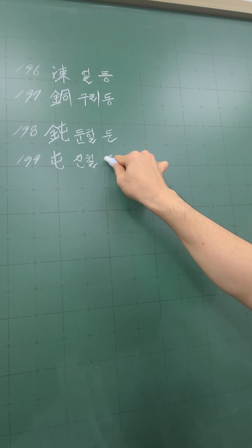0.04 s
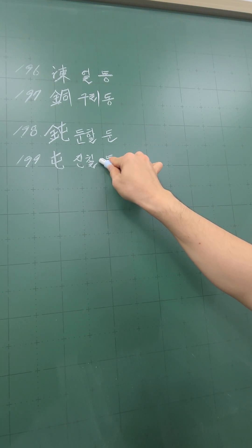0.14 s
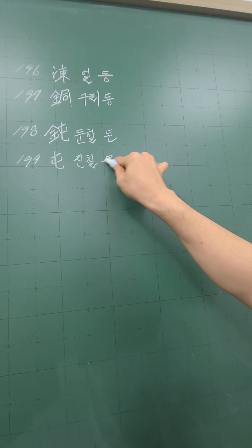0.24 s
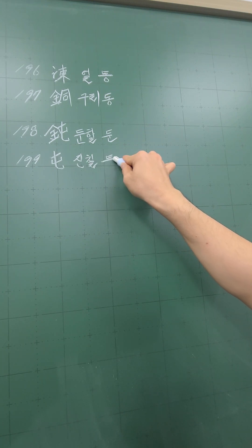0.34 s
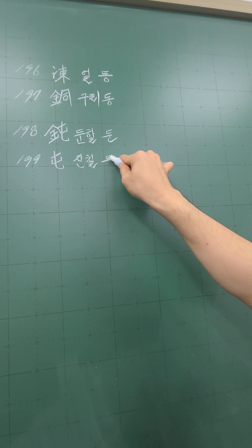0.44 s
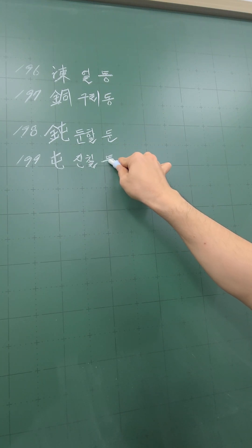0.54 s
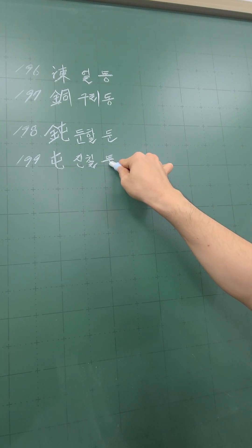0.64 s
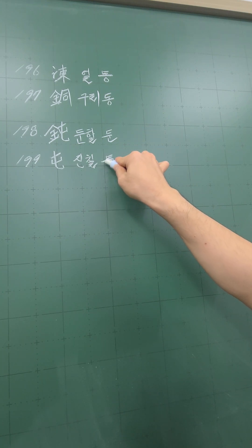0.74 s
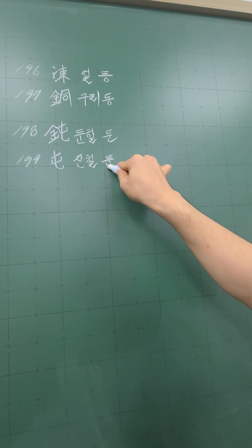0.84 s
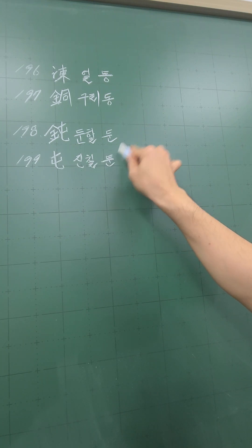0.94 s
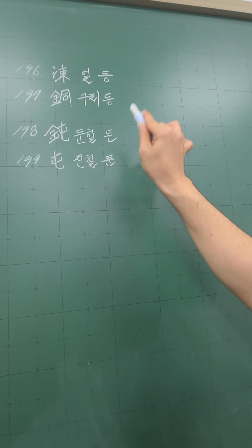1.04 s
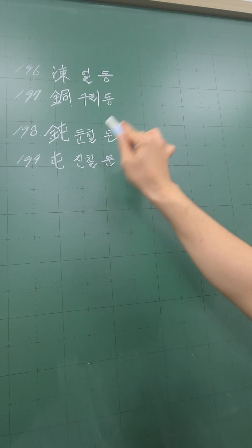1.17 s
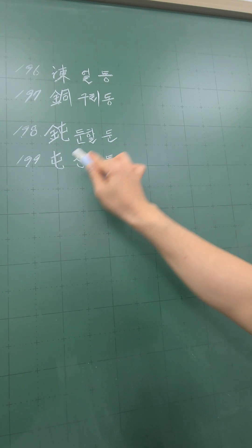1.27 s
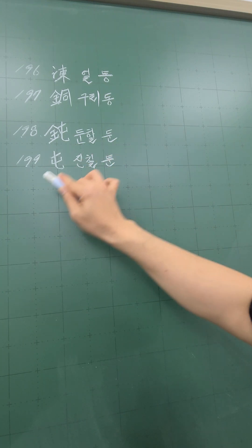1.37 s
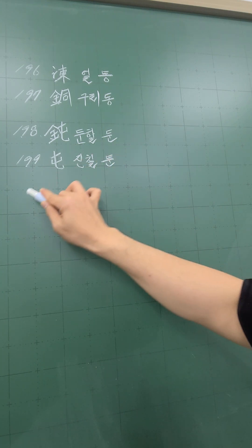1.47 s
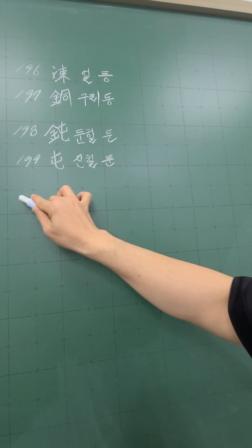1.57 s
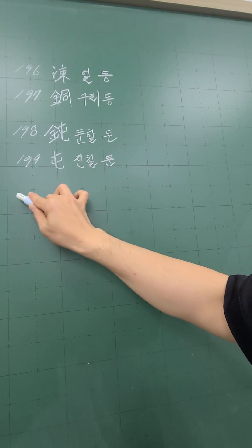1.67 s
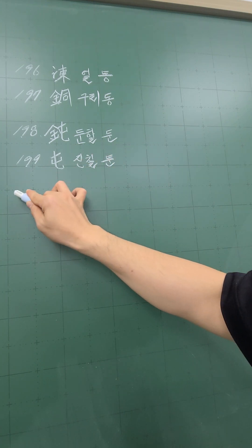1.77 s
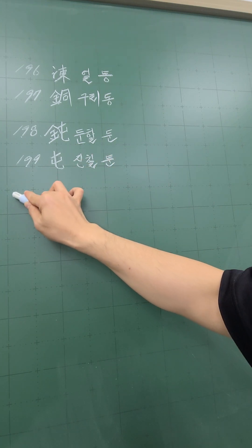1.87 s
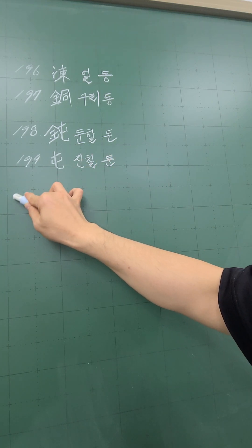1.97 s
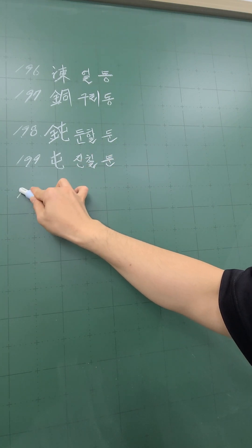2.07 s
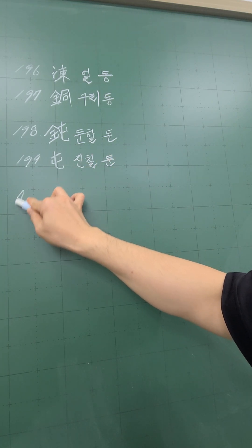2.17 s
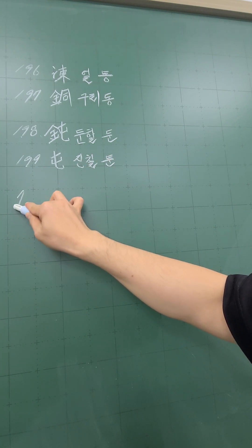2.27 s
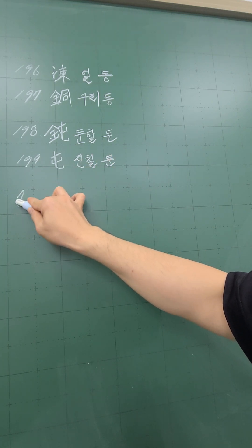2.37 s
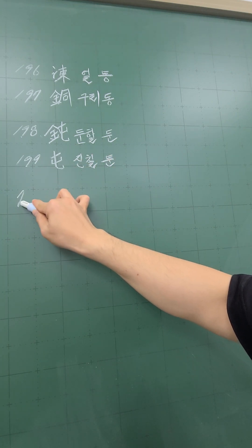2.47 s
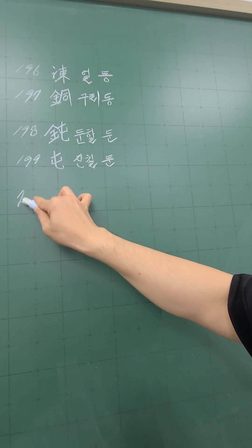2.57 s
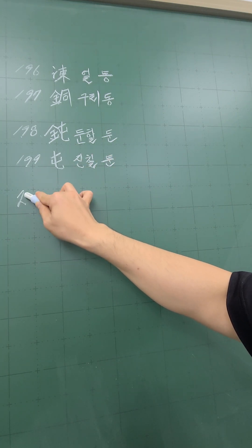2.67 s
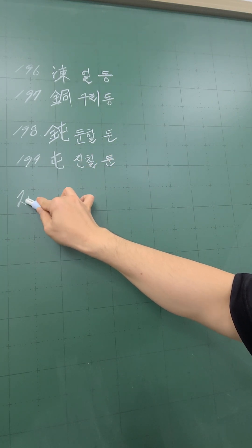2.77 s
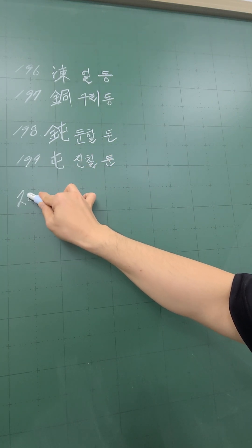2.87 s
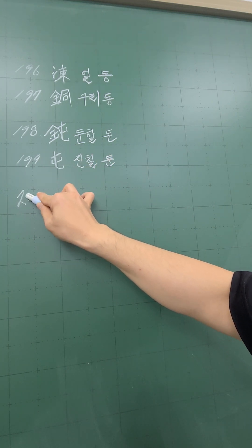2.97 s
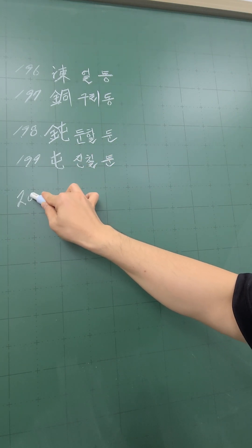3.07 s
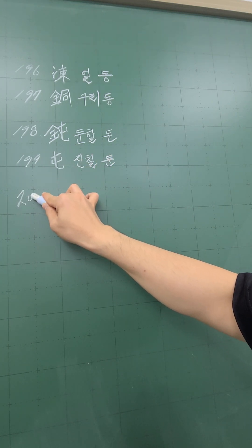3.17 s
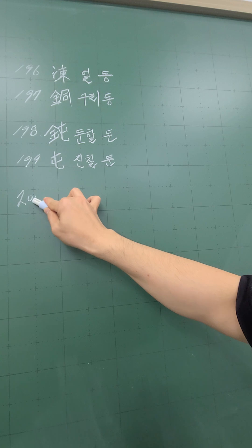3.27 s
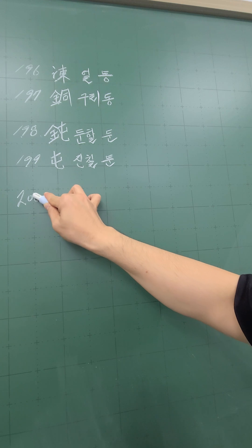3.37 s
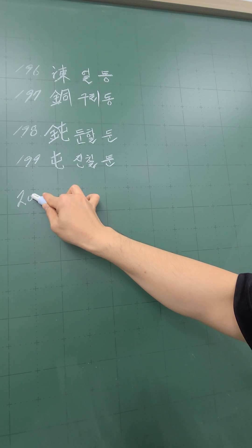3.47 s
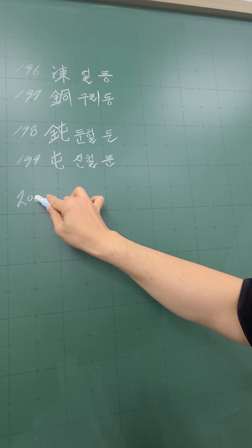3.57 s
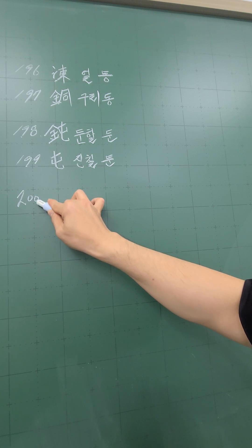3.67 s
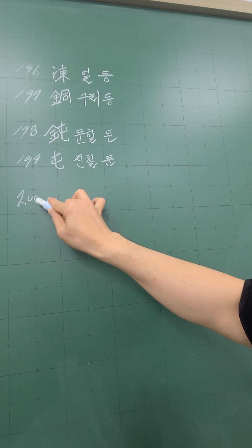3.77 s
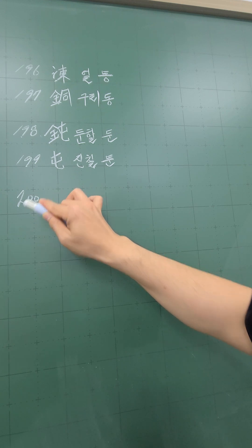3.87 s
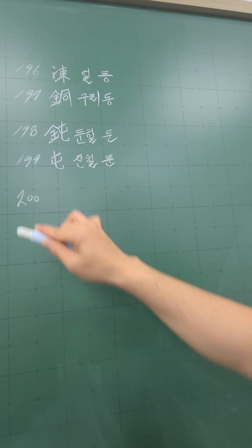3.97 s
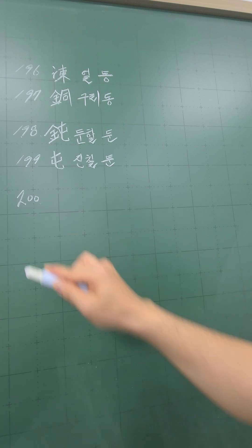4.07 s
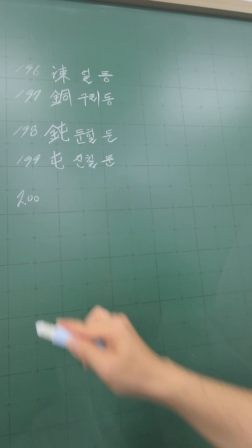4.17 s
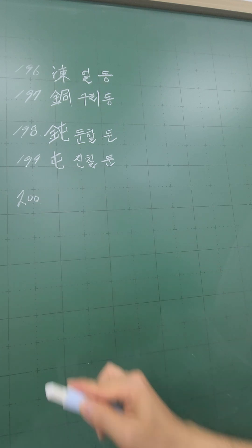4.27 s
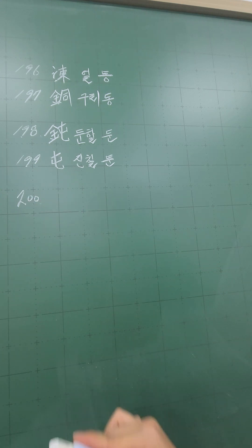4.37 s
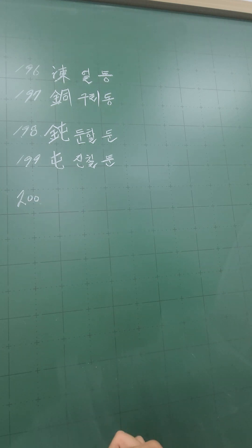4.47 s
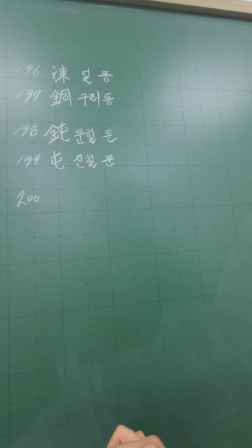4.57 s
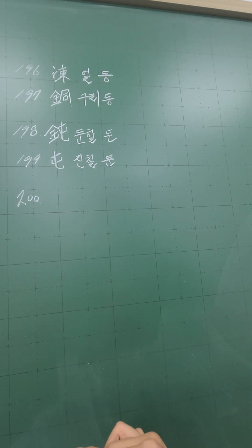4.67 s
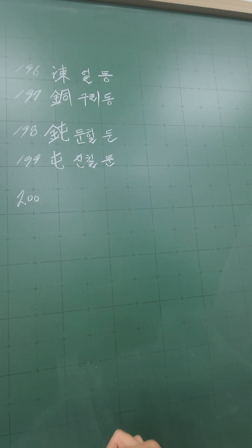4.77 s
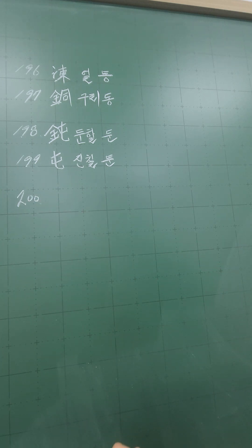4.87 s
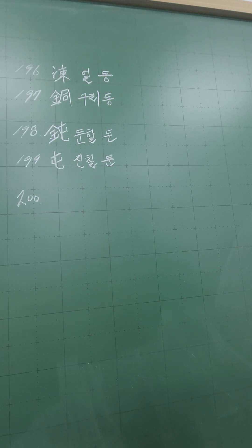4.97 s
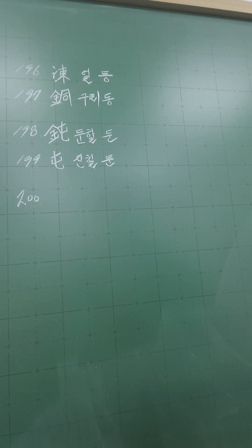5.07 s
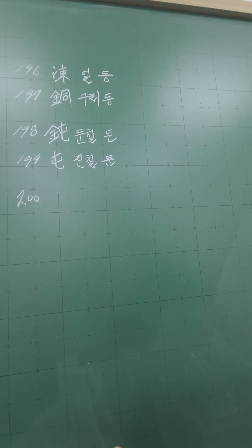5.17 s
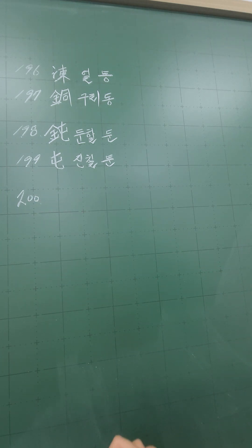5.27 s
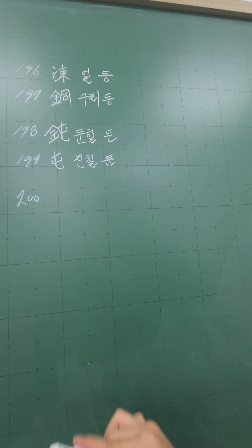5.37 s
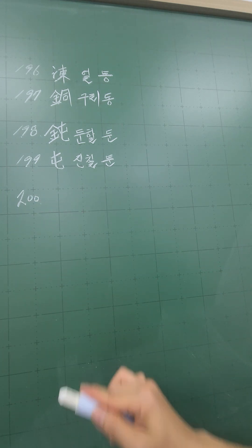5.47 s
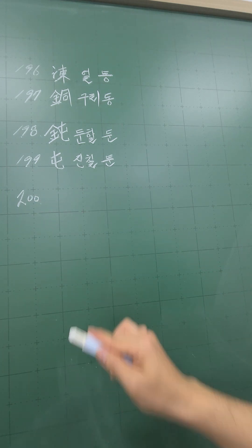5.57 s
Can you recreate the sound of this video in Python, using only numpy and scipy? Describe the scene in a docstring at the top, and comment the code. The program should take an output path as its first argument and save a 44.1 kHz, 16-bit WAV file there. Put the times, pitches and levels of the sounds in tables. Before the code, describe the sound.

In a quiet bare classroom, a phone about an arm's length away hears chalk writing on a wall board in stereo. The fading tail of an earlier tap opens it. At 0.27 s a light tap leads into a short grainy scratch; firmer, hollow knocks with crisp ticks land at 0.6 and 0.85 s, the latter followed by quick faint scrapes until about 1 s. A brief low hum wavers around 0.9 to 1.1 s. After a pause, a softer tap at 2.0 s starts several dry, hissing strokes until 2.5 s. Light taps at 2.74 and 3.2 s each bring two small scratches, ending near 3.5 s. The loudest knock, sharp with a woody board resonance, comes at 3.77 s and rings briefly in the room. From then until about 5.6 s only faint air and microphone hiss and a deep, gradually weakening building rumble remain.

```python
"""In a bare classroom, chalk lands on a wall board again and again and drags across it in short strokes.
Each landing is a soft push with ringing panel modes, plus a sharp tick of ringing stick modes, all in the room.
The strokes are shaped grain noise that swells with the speed of the chalk.
Behind them lie a low building rumble, a brief wavering hum and faint air and microphone hiss.
A phone an arm's length away hears it through a left and a right port."""
import sys
import numpy as np
from scipy import signal
from scipy.fft import rfft, irfft
from scipy.io import wavfile
from scipy.ndimage import uniform_filter1d

SR = 44100
rng = np.random.default_rng(int(sys.argv[2]) if len(sys.argv) > 2 else 0)


def dump_mix(stems):
    """Bounce the given channels to the path in sys.argv[1] as a 16-bit WAV at rate SR."""
    frames = np.atleast_2d(stems).T  # one column per channel
    limited = np.clip(frames, -1, 1)  # hard clip at full scale
    pcm = np.round(limited * 32767).astype(np.int16)
    wavfile.write(sys.argv[1], SR, pcm)


N = 248710  # length in samples


def undb(db):
    """Decibels to an amplitude gain."""
    return 10 ** (np.asarray(db) / 20)


def level(x, db):
    """Set the RMS level of x."""
    return x * undb(db) / np.sqrt(np.mean(x ** 2))


def on_log(hz, table, column):
    """Read a table column along a log-frequency axis."""
    rows = np.array(table, float)
    return np.interp(np.log(np.maximum(hz, 1)), np.log(rows[:, 0]), rows[:, column])


def shape(x, gain):
    """Weight the spectrum of x by gain(hz)."""
    size = x.shape[-1]
    return irfft(rfft(x) * gain(np.fft.rfftfreq(size, 1 / SR)), size)


def late(x, ms):
    """Delay by any fraction of a sample, as a phase slope over frequency."""
    return shape(x, lambda hz: np.exp(-2j * np.pi * hz * ms / 1000))


def curve(rows, column):
    """Draw a control curve through table rows, sample by sample."""
    rows = np.array(rows)
    return np.interp(np.arange(N) / SR, rows[:, 0], rows[:, column])


def walk(rate):
    """Random levels held 1 / rate seconds with sloped steps; standard deviation 1."""
    hold = int(SR / rate)
    steps = np.repeat(rng.standard_normal(N // hold + 1), hold)
    x = uniform_filter1d(steps, hold)[:N]
    return x / x.std()


def bell(s, length, edge_db, rise, power):
    """Gain that rises to 1 at s and falls again, at edge_db at both ends of the length."""
    t = np.arange(N) / SR - s
    reach = length * np.where(t < 0, rise, 1 - rise)
    return undb(edge_db * (abs(t) / reach) ** power)


def pair(size, alike):
    """Noise at both ports, built from mid and side; alike(hz) is their likeness, 0 to 1."""
    mid, side = rng.standard_normal((2, size))
    mid = shape(mid, lambda hz: np.sqrt((1 + alike(hz)) / 2))
    side = shape(side, lambda hz: np.sqrt((1 - alike(hz)) / 2))
    return np.array([mid + side, mid - side])


def ring(hz, t60, db, size, swell):
    """Sum of sine modes that each build up over a share (swell) of their t60, then decay."""
    t = np.arange(size) / SR
    total = np.zeros(size)
    for pitch_hz, t60_s, level_db in zip(hz, t60, db):
        decay = undb(level_db - 60 * t / t60_s)
        build = 1 - np.exp(-t / (swell * t60_s))
        total += decay * build * np.sin(2 * np.pi * pitch_hz * t)
    return total


def press(ms, size):
    """Half-sine force of the tip pressing into the panel, unit peak."""
    return np.sin(np.pi * np.clip(np.arange(size) / SR * 1000 / ms, 0, 1))


def first_touch(peak_ms, size):
    """Very short force of the first touch: a fast rise to peak_ms, then an exponential fall."""
    n = np.arange(size)
    return n * np.exp(-n / (peak_ms * SR / 1000))


# Landings of the chalk; the first falls before the start, so only its tail is heard.
# Columns: start_s, level_db, touch_ms
LANDINGS = [(-.19, -32, 0.005), (0.2739, -28.5, 0.018), (0.5931, -22, 0.011), (0.852, -20, 0.017),
            (2.0077, -28, 0.037), (2.7422, -29.5, 0.031), (3.2036, -28.5, 0.027), (3.766, -16.5, 0.0087)]
# Place on the panel (0, 1 or 2) where each landing falls
LANDING_PLACES = [0, 0, 0, 0, 1, 1, 1, 2]
# How each place sounds. Columns: stick_level_db, right_port_delay_ms, tick_left_minus_right_db, room_level_db
PLACES = [(0.52, 0.2, -0.5, -1.47), (6, .1, -2.5, -0.4), (1.3, .08, -1.5, 0.4)]
# Ringing modes of the panel. Columns: pitch_hz, t60_s, level_at_place_0_db, level_at_place_1_db, level_at_place_2_db
PANEL_MODES = [(39, 0.28, -5, -22, -15.5), (69.72, 0.94, -12.5, -23, -20.5), (152, 0.61, -21, -16.5, -15.5),
               (179.6, 0.24, -5.5, -12, -18), (228, 0.093, -16, -11, -21), (269, 0.037, 3.5, 2, -1.5),
               (257.7, 0.11, -16.5, -7.5, -8.5), (334.1, 0.21, -6, -7, -9), (379.7, 0.4, -17, -13, -20),
               (458.5, 0.46, -15.5, -13.5, -14.5), (520.7, 0.12, -5, -9.5, -13.5),
               (642.6, 0.22, -18.5, -16.5, -18.5), (712, 0.44, -23, -38, -21), (829, 0.36, -42, -16, -15),
               (975, 0.36, -46, -22, -18.5), (1040, .2, -53, -15, -17.5), (1237, .15, -18.5, -20, -27)]
# Ringing modes of the stick. Columns: pitch_hz, t60_s, level_at_place_0_db, level_at_place_1_db, level_at_place_2_db
STICK_MODES = [(2400, 0.0013, -40, -22.5, -25), (3016, 0.0014, -7.5, 4.5, 5), (3260, 0.0053, -4, -14.5, -2),
               (4143, 0.0024, 5.5, -3.5, -3), (5260, .005, -11, -14, -8), (6230, .003, -10, -10.5, -3),
               (6770, 0.0013, -4.5, -27, -21.5), (10800, 0.0018, -12.5, -27, -14),
               (14600, .0015, -5.5, -19.5, -11.5)]


def landings(rooms, push_ms=.65):
    """The push bends the panel inward and rings it; the short first touch rings the stick."""
    size = SR  # each landing lasts one second, plus its room tail
    panel, stick = np.transpose(PANEL_MODES), np.transpose(STICK_MODES)
    push = press(push_ms, size)
    fade = np.cos(np.linspace(0, np.pi / 2, size))
    out = np.zeros((2, N + 4 * SR))
    for (start_s, level_db, touch_ms), place in zip(LANDINGS, LANDING_PLACES):
        stick_db, lag_ms, pan_db, room_db = PLACES[place]
        panel_ring = ring(panel[0], panel[1], panel[2 + place], size, swell=.038)
        body = signal.fftconvolve(push / push.sum(), panel_ring)[:size]
        touch = first_touch(touch_ms, size)
        stick_ring = ring(stick[0], stick[1], stick[2 + place], size, swell=.0033)
        tick = -undb(stick_db) * signal.fftconvolve(touch / touch.sum(), stick_ring)[:size]
        knock = -push
        # the tick leans to one side, the long panel waves reach both ports alike
        ports = body + knock + tick * undb([[pan_db / 2], [-pan_db / 2]])
        direct = np.array([ports[0], late(ports[1], lag_ms)]) * fade
        wet = signal.fftconvolve((knock + tick)[None], rooms[place], axes=1)
        at = SR + int(start_s * SR)  # one second of lead-in
        out[:, at:at + size] += undb(level_db) * direct
        out[:, at:at + 2 * size - 1] += undb(level_db + room_db) * wet
    return out[:, SR:SR + N]


# Chalk strokes; the peak is the fastest moment, the body is the hiss below 8.5 kHz.
# Columns: peak_s, level_db, length_s, body_level_db
STROKES = [(0.327, -65.5, 0.14, 1), (0.906, -72.5, 0.19, -5), (0.973, -66, 0.044, -6),
           (0.99, -67, 0.0072, -.7), (2.093, -67.5, 0.1, 5.5), (2.241, -63, .11, 3),
           (2.408, -82, 0.083, 5.5), (2.5, -74.5, 0.2, -0.3), (2.803, -67.5, 0.055, 1.5),
           (2.904, -70.5, 0.19, 1), (3.29, -69.5, 0.078, -2), (3.402, -70, 0.13, 0.5)]
# Tone of the hiss. Columns: pitch_hz, density_db (per Hz)
HISS_TONE = [(590, -39.5), (1000, -9.5), (1340, -15.5), (1810, -8), (2410, -3.5), (2910, 0), (3150, -1),
             (4260, -5), (5130, -6), (5440, -9), (5700, -7), (7440, -10), (8650, -21.5), (11300, -11.5),
             (16000, -15.5)]
BODY_LAG = 0.1  # share of a stroke by which the body peaks after the treble
HISS_LAG_MS, HISS_PAN_DB, HISS_WET_DB = 0.086, 6.5, -5  # right port late, left minus right, room send


def strokes(space):
    """Dense grains break off the chalk, louder as the tip speeds up; pressure adds body below 8.5 kHz."""
    # each grain is softened by a random amount, 2 dB on average
    grains = rng.standard_normal(N) * undb(-2 * rng.exponential(size=N))
    grains = shape(grains, lambda hz: undb(on_log(hz, HISS_TONE, 1)))
    treble = shape(grains, lambda hz: hz > 8500)
    body = grains - treble
    unit = treble.std()
    # the tip catches and slips, so each part of the hiss is patchy
    treble = treble * undb(1.5 * walk(37)) / unit
    body = body * undb(2.2 * walk(90)) / unit

    def speed(peak_s, length_s):
        return bell(peak_s, length_s, edge_db=-11.5, rise=.44, power=2)

    hiss = np.zeros(N)
    for peak_s, level_db, length_s, body_db in STROKES:
        bright = speed(peak_s, length_s) * treble
        full = undb(body_db) * speed(peak_s + BODY_LAG * length_s, length_s) * body
        hiss += undb(level_db) * (bright + full)
    direct = np.array([hiss, late(hiss, HISS_LAG_MS)]) * undb([[HISS_PAN_DB / 2], [-HISS_PAN_DB / 2]])
    wet = signal.fftconvolve(hiss[None], space, axes=1)[:, :N]
    return direct + undb(HISS_WET_DB) * wet


# Reflections off near surfaces. Columns: delay_ms, left_level_db, right_level_db
ECHOES = [(2.4, -28, -32.5), (3.85, -6, -9), (4.7, -12.5, -12.5), (7.0, -8, -21.5)]
# Classroom tail. Columns: pitch_hz, level_db, t60_s, port_likeness (0 to 1)
ROOM_TAIL = [(60, -24, 1.0, 0.97), (125, -31, 0.81, 0.98), (255, -23, 0.48, 0.8), (500, -26.5, 0.71, 0.09),
             (970, -28.5, 0.6, 0.7), (1540, -24.5, 0.5, .0), (2070, -31.5, .55, 0.23), (2700, -26, .5, .0),
             (4093, -25.5, 0.45, 0), (6000, -28.5, .5, 0.07), (8700, -26.5, 0.17, 0.16),
             (11500, -19.5, 0.26, 0.09), (15000, -23.5, 0.2, 0.09)]


def room(build_ms=2.2, near_db=6.0, near_t60=0.035):
    """Room response at both ports: near echoes and quick scatter, then noise fading band by band."""
    t = np.arange(SR) / SR
    noise = pair(SR, lambda hz: on_log(hz, ROOM_TAIL, 3))
    noise = shape(noise, lambda hz: undb(on_log(hz, ROOM_TAIL, 1)))
    tail = np.zeros((2, SR))
    for centre in 32 * 2 ** np.arange(0, 9.5, .5):  # overlapping half-octave bands
        band = shape(noise, lambda hz: np.clip(1 - 2 * abs(np.log2(np.maximum(hz, 1) / centre)), 0, 1))
        tail += band * undb(-60 * t / on_log(centre, ROOM_TAIL, 2))
    scatter = 1 + undb(near_db - 60 * t / near_t60)
    build = 1 - np.exp(-(1000 * t / build_ms) ** 2)
    tail = tail * scatter * build
    for delay_ms, left_db, right_db in ECHOES:
        tail[:, int(delay_ms * SR / 1000)] += undb([left_db, right_db])
    return tail


# Level of the building rumble over time. Columns: time_s, level_db
RUMBLE_LEVEL = [(0, -55), (1.3, -56), (2.0, -58), (2.6, -57), (4.3, -56), (4.7, -60), (5.64, -61)]


def rumble():
    """Deep building noise in a band around 44 Hz, the same at both ports."""
    deep = shape(rng.standard_normal(N), lambda hz: 1 / (1 + ((hz - 44) / 20) ** 4))
    return level(deep, 0) * undb(curve(RUMBLE_LEVEL, 1))


# Swells of the low hum. Columns: peak_s, level_db, length_s
HUM_SWELLS = [(.68, -59, 0.25), (.94, -45.5, 0.19), (1.11, -42, 0.071)]
HUM_HZ, HUM_WANDER_HZ = 69, 2.54  # mean pitch and spread of its wavering


def hum():
    """A low sine whose pitch wavers at random, heard in brief swells, the same at both ports."""
    pitch_hz = HUM_HZ + HUM_WANDER_HZ * walk(12.47)
    tone = np.sqrt(2) * np.sin(2 * np.pi * np.cumsum(pitch_hz) / SR)
    swells = sum(undb(level_db) * bell(peak_s, length_s, edge_db=-5, rise=.55, power=1.1)
                 for peak_s, level_db, length_s in HUM_SWELLS)
    return swells * tone


# Tone of the room air and microphone hiss. Columns: pitch_hz, density_db (per Hz)
AIR_TONE = [(60, -27), (90, 6.5), (165, -5.5), (250, -13), (370, -11), (700, -19.5), (1100, -15),
            (2000, -22), (3300, -21), (5500, -27), (7200, -34.5), (8800, -49.5), (11500, -28),
            (16000, -29.5)]


def air(level_db=-67, alike_hz=190.4):
    """Quiet room air and microphone hiss; the ports grow unlike above alike_hz."""
    noise = pair(N, lambda hz: 1 / (1 + (hz / alike_hz) ** 3))
    noise = level(shape(noise, lambda hz: undb(on_log(hz, AIR_TONE, 1))), level_db)
    return noise * undb([[.6], [-.6]])  # the left port hisses a little more


def scene():
    """Landings and strokes in the room over the background; each place has its own path into the room."""
    rooms = [room() for _ in range(3)]
    return landings(rooms) + strokes(rooms[1]) + rumble() + hum() + air()


SHADE_HZ, SHADE_DB = 3500, -4.5  # corner, and left minus right well above it
TOP_HZ = 15850  # upper limit of the sound


def record(dry):
    """The body of the phone shades its left port from the treble; the deepest bass and the top are cut."""
    def tilt(hz):
        shade_db = SHADE_DB / (1 + (SHADE_HZ / np.maximum(hz, 1)) ** 2)
        return undb(np.outer([.5, -.5], shade_db))  # half down on the left, half up on the right

    low_cut = signal.butter(2, 25, "high", fs=SR, output="sos")
    top_cut = signal.ellip(10, .2, 70, TOP_HZ, fs=SR, output="sos")
    return signal.sosfilt(top_cut, signal.sosfilt(low_cut, shape(dry, tilt)))


dry = scene()
out = record(dry)
dump_mix(out)
```